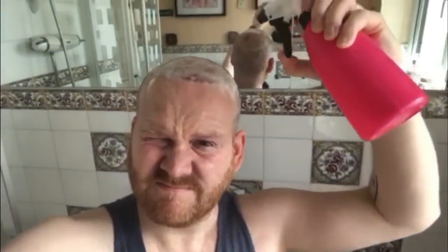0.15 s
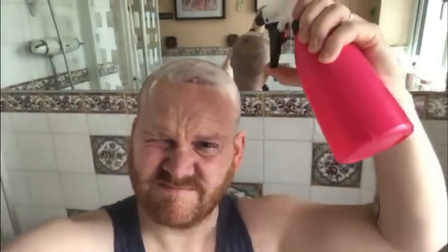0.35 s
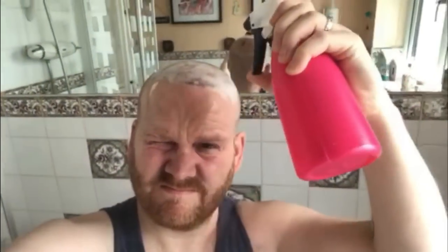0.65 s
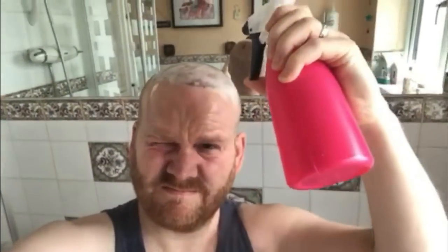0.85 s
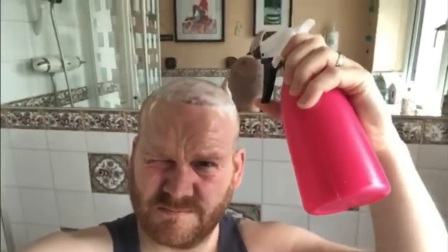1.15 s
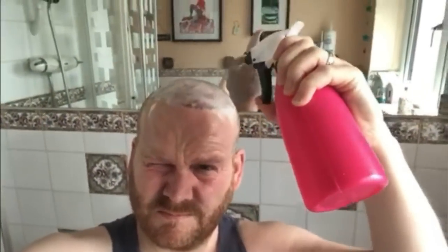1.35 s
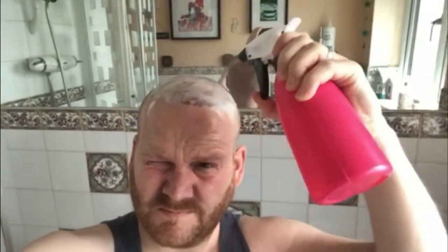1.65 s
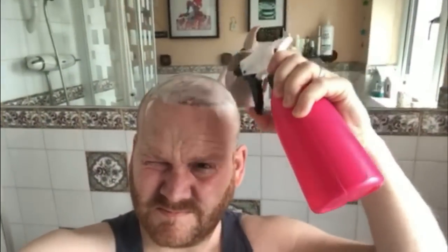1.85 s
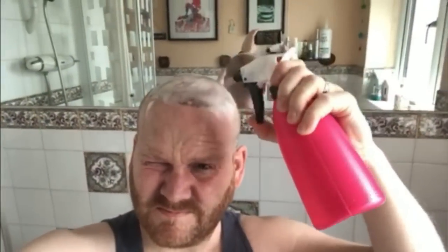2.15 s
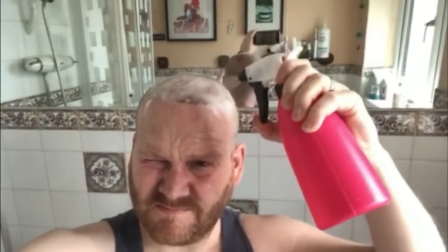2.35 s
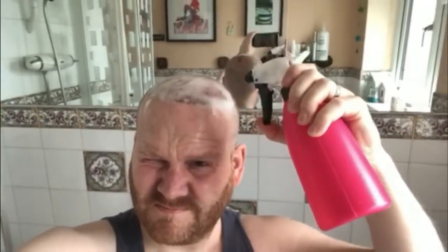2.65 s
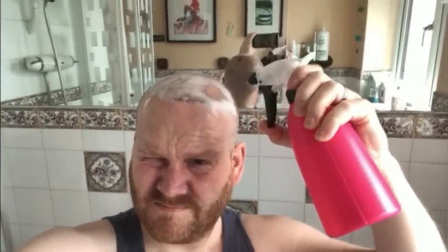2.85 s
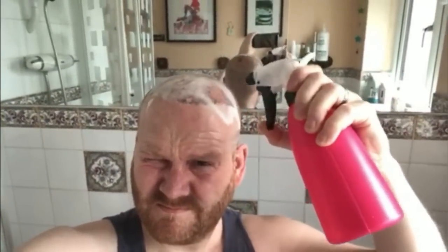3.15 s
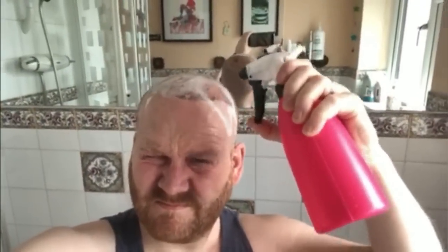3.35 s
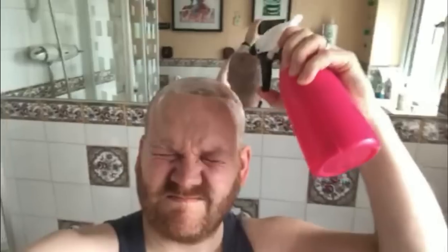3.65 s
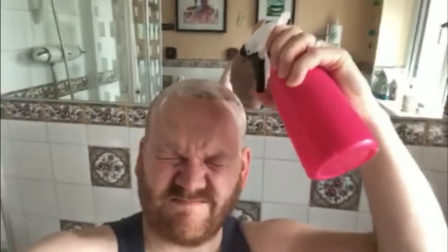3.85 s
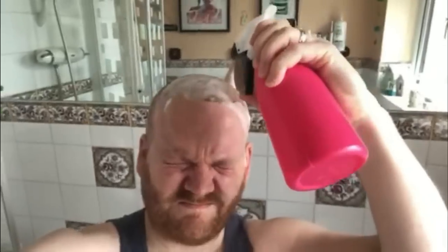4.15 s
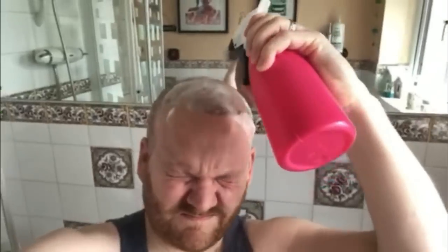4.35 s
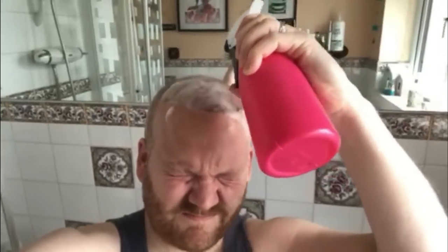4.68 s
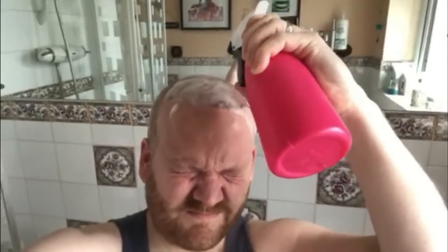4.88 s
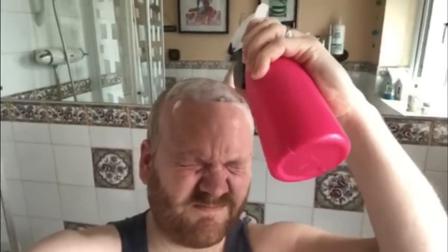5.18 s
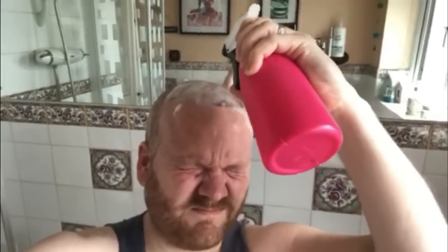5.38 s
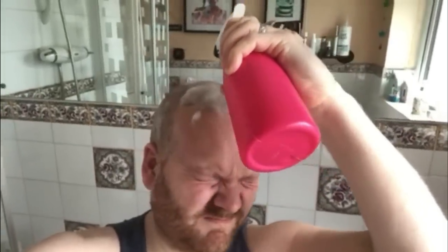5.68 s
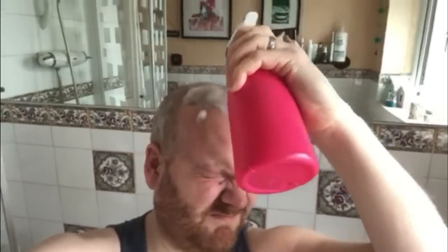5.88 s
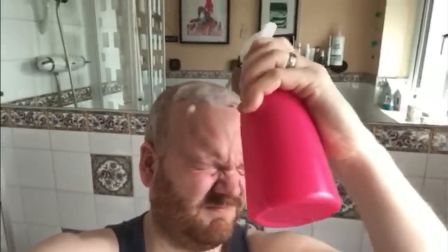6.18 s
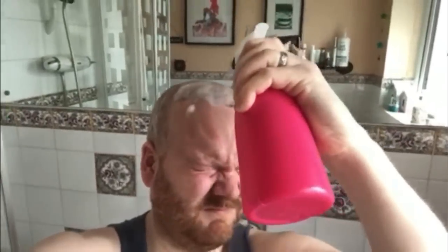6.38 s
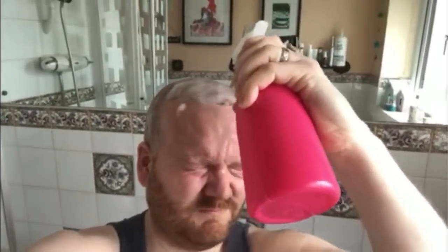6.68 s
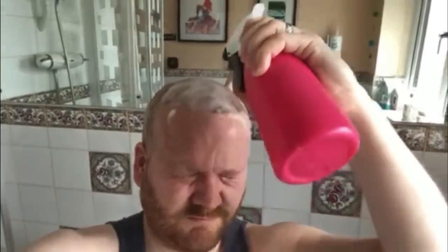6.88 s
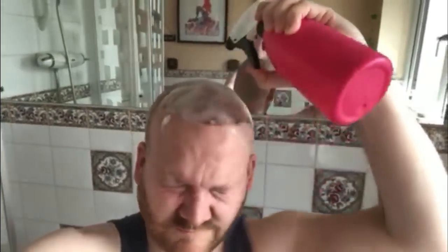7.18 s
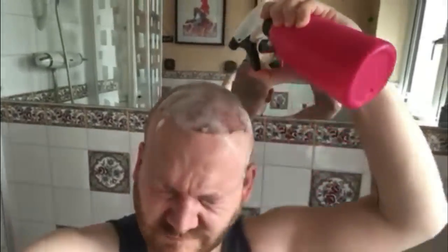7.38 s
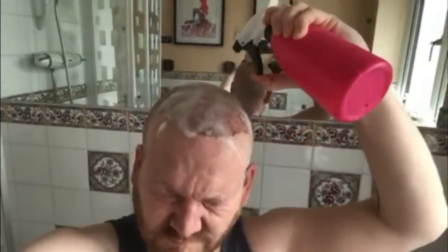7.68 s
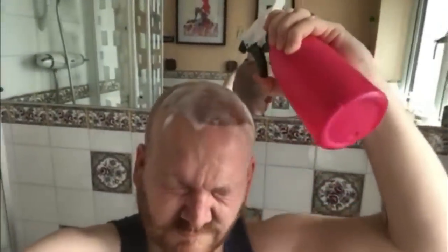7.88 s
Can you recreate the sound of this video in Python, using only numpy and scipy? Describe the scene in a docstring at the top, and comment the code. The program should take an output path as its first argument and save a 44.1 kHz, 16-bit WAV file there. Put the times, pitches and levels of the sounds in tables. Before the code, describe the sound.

Trigger sprayer heard near the microphone: bright plastic clack, tiny spring ring, hollow bottle hum, then a tenth of a second of wet hiss. After an early squirt comes a near-silent gap with a small slop and ticks, then continuous brisk pumping, slightly uneven in strength, with one almost dry click midway. Hard tiles add a short, bright reverberation; the room is otherwise quiet.

```python
"""A trigger spray bottle is pumped at someone's scalp in a tiled bathroom, over quiet room noise.
Two pulls come first, then a rest of over a second, ended by a pull that barely snaps but sprays fully;
quick pumping fills the remainder. In each pull the trigger catches, snaps (shaped knocks), its spring rings
and the bottle hums (dying sines); then the valve opens for an arch of hissing mist (noise and droplet
impulses). Water slops, grip bumps and ticks fall in between; the tiles add echoes and a short noise tail."""
import sys
import numpy as np
from scipy import signal
from scipy.fft import rfft, irfft
from scipy.io import wavfile
from scipy.ndimage import uniform_filter1d

SR = 44100
rng = np.random.default_rng(int(sys.argv[2]) if len(sys.argv) > 2 else 0)


def dump(signal):
    """Clip the signal to [-1, 1] and save it as 16-bit WAV at the path in sys.argv[1]."""
    limited = np.clip(np.atleast_2d(signal).T, -1, 1)
    pcm = np.round(limited * 32767).astype(np.int16)
    wavfile.write(sys.argv[1], SR, pcm)


N = 354123
LEAD = SR // 4  # samples before time zero: the pumping is already under way
AIR_DB = -69.5  # rms
EDGE_HZ = 15950

# Room noise spectrum. Each row: frequency in Hz, relative level in dB.
AIR_SPECTRUM = [(15, -41), (25, -21.5), (86, -3), (119, -11), (152, -3.5), (188, -7), (240, -3), (274, -5),
                (359, -10.5), (410, -5.5), (495, -8), (1530, -18), (7300, -23.5), (15500, -30.5)]
# Tile reverberation. Each row: frequency in Hz, 60 dB decay time in seconds.
TILE_DECAYS = [(150, 0.97), (700, 0.49), (2000, 0.42), (4500, 0.37), (8000, 0.31), (15000, 0.22)]
# First echoes off head and walls. Each row: delay in seconds, level in dB.
FIRST_ECHOES = [(.0005, -31), (.0031, -45), (.0037, -13), (.0052, -24), (.0089, -21), (0.0124, -26)]
# Thinner share of the snap that reaches the walls. Each row: frequency in Hz, gain in dB.
SIDEWAYS_SPECTRUM = [(300, 4), (1300, 5.5), (2000, -4), (3400, -2), (4600, 0), (7000, 0.5), (10000, 2),
                     (16000, -0.5)]
# Dull bumps of the bottle in the hand. Each row: start in seconds, relative level in dB.
HAND_BUMPS = [(.63, -60), (1.72, -55), (3.875, -57.5), (4.052, -64), (5.309, -58), (6.0, -62), (6.895, -57),
              (6.941, -60), (7.134, -61)]
# Bump spectrum. Each row: frequency in Hz, relative level in dB.
BUMP_SPECTRUM = [(30, -22), (70, -1.5), (150, -1.5), (300, -10.0), (2000, -51)]
# Water slopping in the bottle. Each row: start in seconds, level in dB, starting pitch in Hz.
WATER_SLOPS = [(1.062, -60, 600), (1.708, -50, 560), (1.801, -55.5, 520), (2.203, -57, 300),
               (3.715, -58, 660), (4.06, -55, 660), (7.05, -49, 720)]
# Bottle hum modes. Each row: frequency in Hz, relative level in dB, 60 dB decay time in seconds.
BOTTLE_MODES = [(201, -36.5, 0.67), (286.9, -39.5, 0.47), (151, -38.5, 0.23), (251, -40, 0.31),
                (439, -38, 0.091), (498, -40, 0.13)]
# Band of the bottle hum. Each row: frequency in Hz, gain in dB.
HUM_BAND = [(40, -37), (120, -3), (550, -2.0), (900, -24)]
# Ticks of the grip and the returning trigger. Each row: start in seconds, relative level in dB.
GRIP_TICKS = [(1.3, -47), (1.322, -41), (3.762, -54), (3.831, -47), (5.433, -46), (6.094, -54)]
# Knock spectrum of the plastic head. Each row: frequency in Hz, relative level in dB.
PLASTIC_SPECTRUM = [(200, -25), (1000, -23.5), (1400, -7), (1800, 3), (3400, 5), (4400, -2), (5000, 2.5),
                    (5600, -1.5), (7500, -3), (8700, -2.5), (13000, -1), (16000, -5)]
# Treble tilt of a knock. Each row: frequency in Hz, dB of gain per unit of brightness.
BRIGHTNESS_TILT = [(4500, 0.024), (10000, 0.5)]
# Trigger spring modes. Each row: frequency in Hz, relative level in dB, 60 dB decay time in seconds.
SPRING_MODES = [(7830, -19, 0.035), (7000, -19.5, 0.026), (6270, -23, 0.026), (5270, -27, 0.018)]
# Jet hiss spectrum. Each row: frequency in Hz, relative level in dB.
JET_SPECTRUM = [(50, -50), (150, -20.5), (500, -8), (680, -16), (900, -5), (1200, -3), (2100, 0),
                (3300, 1.5), (6300, -2.5), (7300, -0.5), (7900, -0.5), (8400, -4), (10200, -1.5),
                (16000, -4)]
# Trigger pulls. Each row: snap time in seconds, relative snap level in dB, snap brightness in tilt units,
# squirt length in seconds, relative squirt level in dB, relative fine mist level in dB.
PULLS = [(-0.14, -38, -6, .12, -47.5, .5), (0.1529, -33.5, 6.5, 0.11, -48, -0.5),
         (1.33, -58, -10, .136, -45, -2), (1.6338, -26, -4, 0.12, -46, 0),
         (1.9187, -28.5, -17, 0.12, -45, 6.5), (2.1934, -27.5, 1, 0.084, -46, 6),
         (2.4297, -27, -2, 0.073, -46.5, 4.5), (2.6571, -27, -2, .074, -47.5, 5),
         (2.8714, -30, 1, 0.045, -53, 3), (3.0797, -30, -3, 0.047, -53.5, 2),
         (3.2846, -30, 3.5, 0.041, -55, 2), (3.5896, -33.5, -11, 0.1, -66.3, 2),
         (3.8503, -28, -5, 0.068, -49.5, 0), (4.086, -29.5, -11, 0.089, -52, 4.5),
         (4.3517, -27.5, -14, 0.1, -47, 3.5), (4.6237, -28.5, -5, 0.11, -48, 4),
         (4.9179, -28.5, -13, 0.12, -47.5, 3), (5.2147, -27, -7.5, 0.081, -50.5, 3.5),
         (5.483, -27.5, -9, 0.11, -47.5, 2.5), (5.7899, -28.5, -12, .131, -47, 1),
         (6.116, -32, -7, 0.14, -49, -0.5), (6.4029, -27, -6, 0.093, -49.5, 2.5),
         (6.671, -27.5, -6, 0.086, -50, 5), (6.965, -27.5, -1, 0.1, -47, 4.5),
         (7.238, -26.5, -4, .11, -48, 3.5), (7.544, -33, 4, 0.13, -48, 0.5),
         (7.8501, -31.5, -3, 0.1, -49, 4)]

USUAL_SQUIRT_S, USUAL_SQUIRT_DB = .1, -48
VALVE_S = .0075  # snap to valve opening, usual squirt
SLACK_S_PER_DB = .0006  # a weak squirt opens the valve later
SLACK_SHARE = .13  # share of a short squirt's missing time lost at the start
LOW_HISS_DB, LOW_PER_MIST_DB = 2.5, -0.23  # finer mist leaves less low hiss
SPRING_DB, SPRING_PER_BRIGHTNESS_DB = 2.5, 0.55  # brighter snap, louder spring


def gain_of(db):
    """Decibels to amplitude."""
    return 10 ** (np.asarray(db) / 20)


def evened(x):
    """Scale to an rms of one."""
    return x / np.sqrt(np.mean(x ** 2) + 1e-20)


def read(points, hz):
    """Interpolate a table on a log-frequency axis."""
    table_hz, value = np.transpose(points)
    return np.interp(np.log(hz + 1), np.log(table_hz + 1), value)


def add(mix, start_s, sound):
    """Add a sound at start_s, after the lead-in."""
    part = mix[max(LEAD + round(start_s * SR), 0):][:len(sound)]
    part += sound[:len(part)]


def coloured(x, points, extra=((1, 0), (2, 0))):
    """Filter by a spectrum plus a second shading."""
    hz = np.fft.rfftfreq(len(x), 1 / SR)
    gain = gain_of(read(points, hz) + read(extra, hz))
    return irfft(rfft(x) * gain, len(x))


def swell(t, peak_s):
    """Soft envelope reaching one at peak_s, then dying away."""
    return t / peak_s * np.exp(1 - t / peak_s)


def ring(modes, detune, spread_db):
    """Dying sines, each struck a little differently."""
    t = np.arange(SR // 2) / SR
    out = np.zeros(len(t))
    for hz, db, t60_s in modes:
        decay = gain_of(db + spread_db * rng.normal() - 60 * t / t60_s)
        mode_hz = hz * (1 + detune * rng.normal())
        out += decay * np.sin(2 * np.pi * mode_hz * t)
    return out


def impact(brightness, uneven_db, size=1024):
    """Minimum-phase knock of the plastic head, with random spectral ripple of uneven_db."""
    hz = abs(np.fft.fftfreq(size, 1 / SR))
    ripple = evened(uniform_filter1d(rng.standard_normal(size), size=22))
    ripple = ripple[np.round(hz * size / SR).astype(int)]  # mirrored for negative frequencies
    db = read(PLASTIC_SPECTRUM, hz) + brightness * read(BRIGHTNESS_TILT, hz) + uneven_db * ripple
    log_spectrum = np.conj(signal.hilbert(np.log(gain_of(db))))  # causal phase
    return np.fft.ifft(np.exp(log_spectrum)).real


def air():
    """Quiet room noise whose low end wavers, as a whole and in small patches."""
    frames = dict(fs=SR, nperseg=1024, noverlap=768)
    hz, _, z = signal.stft(coloured(rng.standard_normal(N), AIR_SPECTRUM), **frames)
    patches = uniform_filter1d(rng.standard_normal(z.shape), size=7, axis=0)
    patches = evened(uniform_filter1d(patches, size=6, axis=1))
    waver = evened(uniform_filter1d(rng.standard_normal(z.shape[1]), size=8))
    depth_db = 1.5 / (1 + (hz[:, None] / 1000) ** 4)
    noise = signal.istft(z * gain_of(depth_db * (waver + patches)), **frames)[1]
    return gain_of(AIR_DB) * evened(noise[:N])


def bathroom(x, tail_db=1.5, first_db=-6, first_s=0.015):
    """Single echoes off head and walls, a spray of random ones, and a diffuse tail."""
    t = np.arange(SR // 12) / SR
    hits = rng.random(len(t)) < 4000 / SR  # echoes per second
    taps = rng.standard_normal(len(t)) * hits * (t > .002) * np.exp(-t / first_s)
    taps *= gain_of(first_db) / np.linalg.norm(taps)
    for delay_s, db in FIRST_ECHOES:
        taps[round(delay_s * SR)] += gain_of(db)
    # energy piles up and leaks away, each band at its own speed, all phase lost
    frames, hop = dict(fs=SR, nperseg=256, noverlap=192), 64
    hz, _, z = signal.stft(x, **frames)
    keep = gain_of(-120 * hop / SR / read(TILE_DECAYS, hz))  # energy kept per hop
    stored = np.array([signal.lfilter([0, 0, 0, 1 - k], [1, -k], abs(band) ** 2)
                       for band, k in zip(z, keep)])
    noise = signal.stft(rng.standard_normal(len(x)), **frames)[2]
    tail = signal.istft(np.sqrt(stored) * noise / noise.std(), **frames)[1][:len(x)]
    return signal.oaconvolve(x, taps)[:len(x)] + gain_of(tail_db) * tail


def hand(swell_s=0.01, bump_db=-5):
    """Soft low noise bumps as the grip shifts."""
    out, t = np.zeros(N + LEAD), np.arange(SR // 6) / SR
    for start_s, db in HAND_BUMPS:
        thud = evened(coloured(rng.standard_normal(len(t)), BUMP_SPECTRUM))
        add(out, start_s, gain_of(db + bump_db) * swell(t, swell_s) * thud)
    return out


def water(fall_s=.011, rest_hz=130, swell_s=.003, froth=.35):
    """Soft gulps that drop quickly in pitch, frothed with noise near the starting pitch."""
    out, t = np.zeros(N + LEAD), np.arange(SR // 10) / SR
    for start_s, db, hz in WATER_SLOPS:
        turns = np.cumsum(rest_hz + (hz - rest_hz) * np.exp(-t / fall_s)) / SR
        splash_spectrum = [(60, -15), (hz / 2, -2), (hz, 0), (2 * hz, -20), (8 * hz, -45)]
        splash = evened(coloured(rng.standard_normal(len(t)), splash_spectrum))
        gulp = np.sin(2 * np.pi * turns) + froth * splash
        add(out, start_s, gain_of(db) * swell(t, swell_s) * gulp)
    return out


def hollow(hum_db=4, push_s=0.00487):
    """Air and thin walls of the bottle hum as the piston starts to push."""
    out = np.zeros(N + LEAD)
    for snap_s, db, *_ in PULLS:
        hum = ring(BOTTLE_MODES, detune=.009, spread_db=2)
        add(out, snap_s + push_s, gain_of(db + hum_db) * hum)
    return coloured(out, HUM_BAND)


def trigger(uneven_db, chatter_db, snap_db=15, catch_db=1, catch_s=0.001406, chatter_s=0.0012, tick_db=8):
    """The trigger catches, snaps home and chatters; its spring rings; the grip ticks."""
    out, t = np.zeros(N + LEAD), np.arange(SR // 100) / SR
    for snap_s, db, brightness, *_ in PULLS:
        blow = gain_of(chatter_db) * rng.standard_normal(len(t)) * np.exp(-t / chatter_s)
        blow[0] = 1
        blow /= np.linalg.norm(blow)
        catch = impact(brightness - 3, uneven_db)
        snap = np.convolve(blow, impact(brightness, uneven_db))
        spring = ring(SPRING_MODES, detune=0.016, spread_db=1.5)
        spring_db = SPRING_DB + SPRING_PER_BRIGHTNESS_DB * brightness
        add(out, snap_s - catch_s, gain_of(db + catch_db) * catch)
        add(out, snap_s, gain_of(db + snap_db) * snap)
        add(out, snap_s, gain_of(db + spring_db) * spring)
    for start_s, db in GRIP_TICKS:
        add(out, start_s, gain_of(db + tick_db) * impact(-21, uneven_db))
    return out


def nozzle(jet_db=4.0, arch=0.82, coarse_arch=1.0, coarse_lead=0.72, drops_per_s=3500, drop_share=0.24,
           flutter_db=1, mist_offset_db=-1.0):
    """Pressure rises and falls with the squeeze; the jet hisses and breaks into droplets."""
    out, t = np.zeros(N + LEAD), np.arange(SR // 4) / SR
    low_pass = signal.butter(2, 1700, fs=SR, output="sos")
    for snap_s, _, _, length_s, db, mist_db in PULLS:
        slack_s = SLACK_S_PER_DB * (USUAL_SQUIRT_DB - db) + SLACK_SHARE * (USUAL_SQUIRT_S - length_s)
        hiss, drop_size, flutter = rng.standard_normal((3, len(t)))
        drops = evened(drop_size * (rng.random(len(t)) < drops_per_s / SR))
        jet = np.sqrt(1 - drop_share) * hiss + np.sqrt(drop_share) * drops
        jet *= gain_of(flutter_db * evened(uniform_filter1d(flutter, size=200)))
        low_db = LOW_HISS_DB + LOW_PER_MIST_DB * mist_db
        shade = [(1300, low_db), (3000, 0), (4500, 0), (9000, mist_db + mist_offset_db)]
        jet = coloured(jet, JET_SPECTRUM, shade)
        # coarse, low spatter peaks first; the fine mist needs full pressure
        coarse = signal.sosfiltfilt(low_pass, jet)
        stroke = np.minimum(t / length_s, 1)
        early = abs(np.sin(np.pi * stroke ** coarse_lead)) ** coarse_arch
        pressure = abs(np.sin(np.pi * stroke)) ** arch
        squirt = early * coarse + pressure * (jet - coarse)
        add(out, snap_s + VALVE_S + slack_s, gain_of(db + jet_db) * squirt)
    return out


def scene():
    """Bottle and room, the same in both channels."""
    room_noise = air()
    facing = trigger(uneven_db=2, chatter_db=-15)  # the flat side beams the snap forward
    all_round = trigger(uneven_db=0, chatter_db=-40)  # colour evens out over all directions
    snaps = facing + bathroom(coloured(all_round, SIDEWAYS_SPECTRUM), tail_db=0, first_db=-13.5)
    mist = nozzle()
    wet_mist = mist + bathroom(mist, tail_db=3.5, first_db=-1)
    bottle = hand() + water() + hollow() + snaps + wet_mist
    return np.array([bottle[LEAD:] + room_noise] * 2)


def record(dry):
    """The recorder's band limit: a linear-phase low-pass at EDGE_HZ."""
    low_pass = signal.firwin(511, EDGE_HZ, window=("kaiser", 9), fs=SR)
    return signal.oaconvolve(dry, low_pass[None], "same")


dry = scene()
out = record(dry)
dump(out)
```